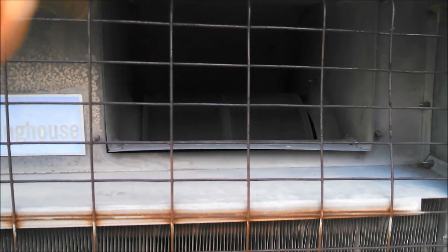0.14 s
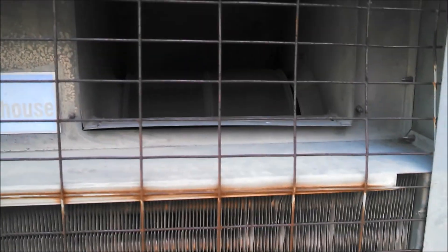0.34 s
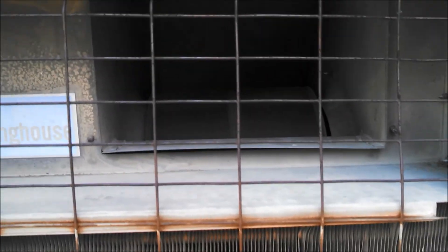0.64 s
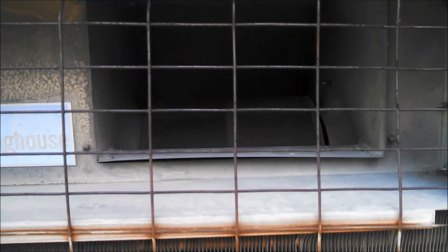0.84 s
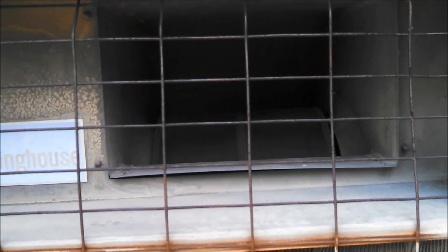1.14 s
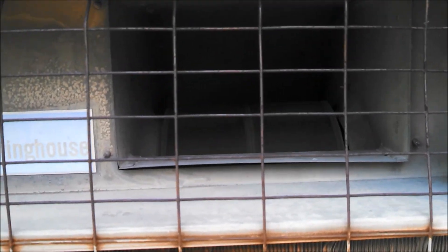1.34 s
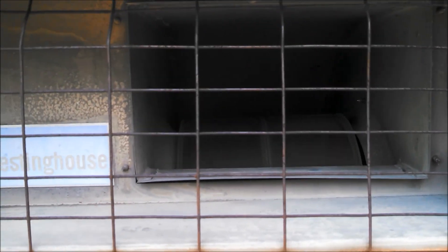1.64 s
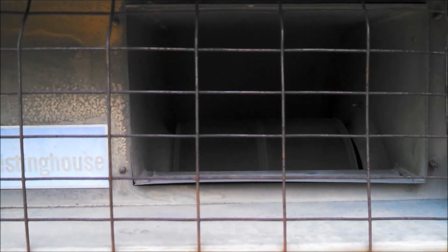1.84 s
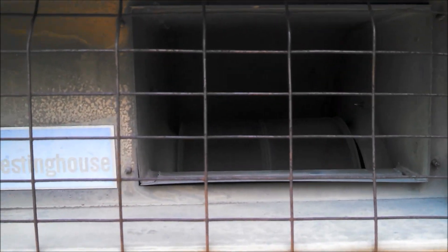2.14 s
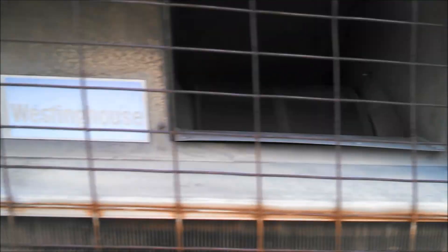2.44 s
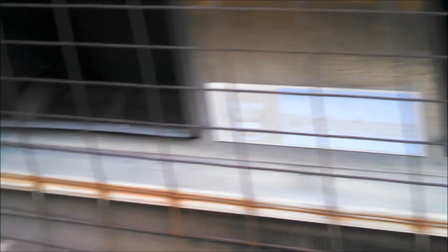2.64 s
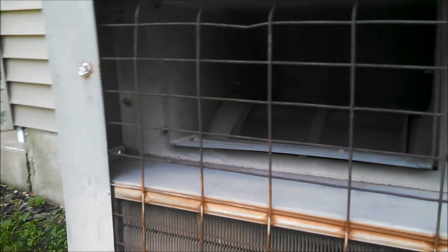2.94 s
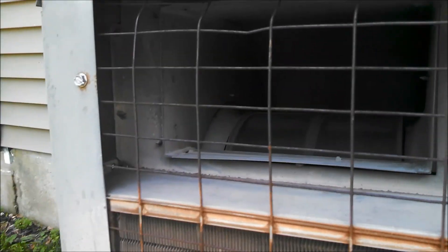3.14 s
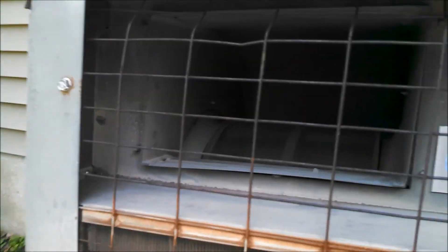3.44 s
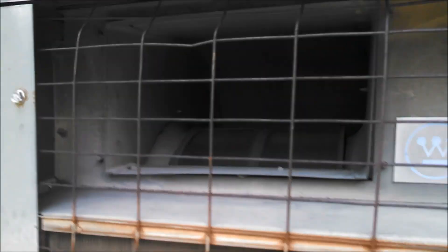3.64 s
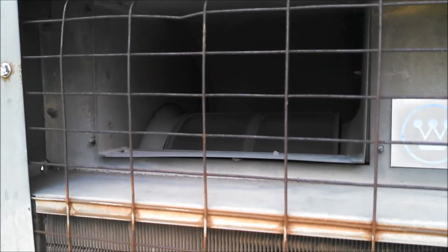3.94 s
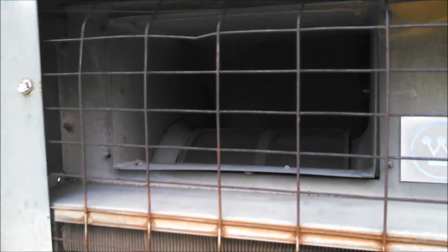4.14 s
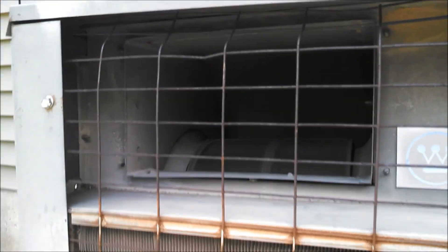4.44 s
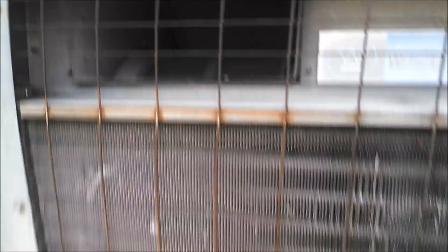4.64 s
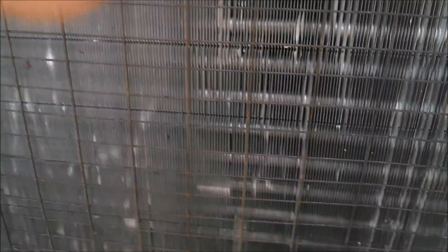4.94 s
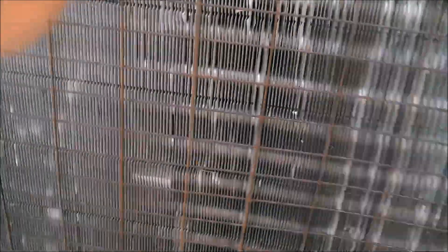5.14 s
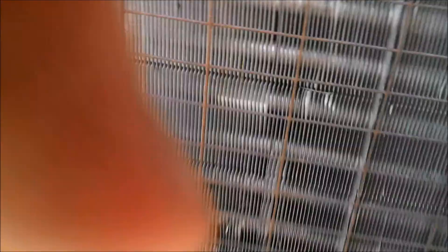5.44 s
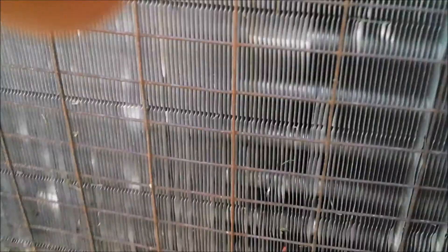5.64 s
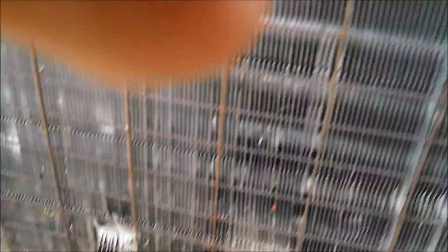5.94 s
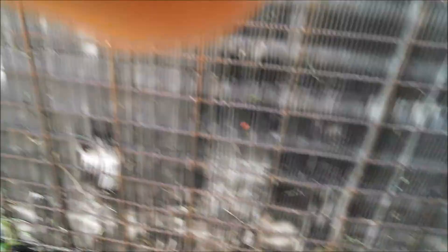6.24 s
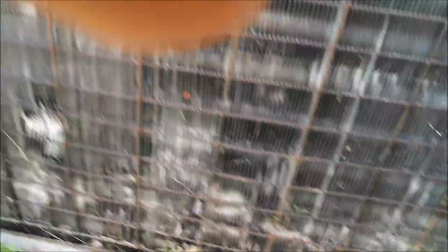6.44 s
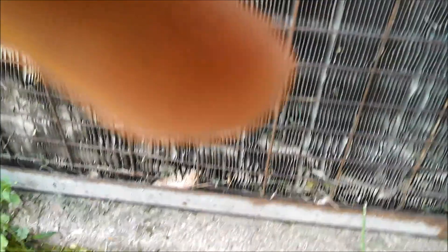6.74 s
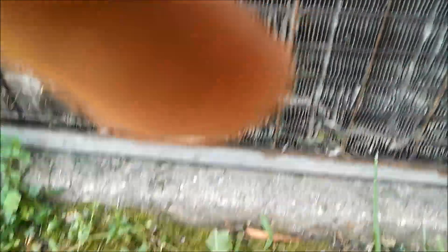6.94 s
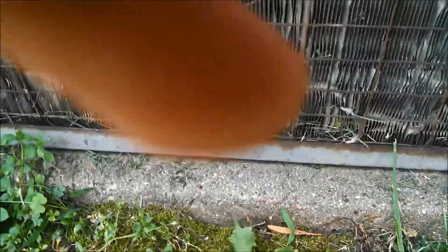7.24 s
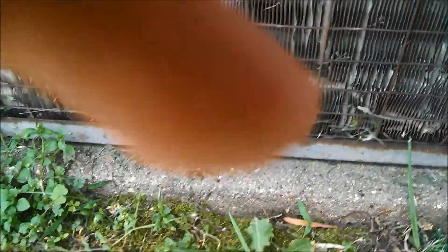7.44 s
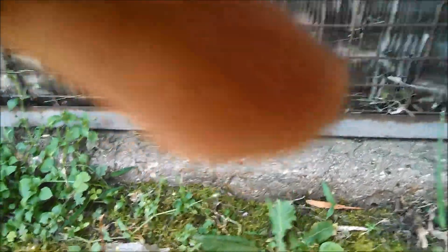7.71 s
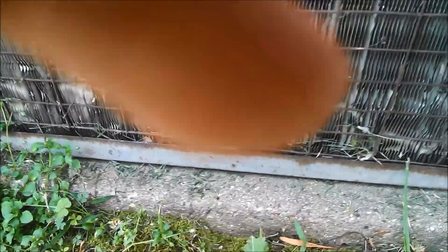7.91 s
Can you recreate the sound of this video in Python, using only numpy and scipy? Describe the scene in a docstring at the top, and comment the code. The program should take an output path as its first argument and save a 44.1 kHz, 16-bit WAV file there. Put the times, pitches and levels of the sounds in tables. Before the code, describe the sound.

Outdoors, a handheld microphone sits in the air stream of an old window air conditioner. Loud, distorted wind rumble, flutter and sharp slaps cover the machine, with one momentary break before three seconds. Past five and a half seconds the wind drops away with a flare of keen hiss, and the fan's rapidly throbbing rush, ringing metal cabinet and compressor hum come forward, steady to the end.

```python
"""Outdoors, a hand-held microphone close to an old window air conditioner: fan rush throbs once a shaft turn over hum.
At first it sits in the outlet's air stream: shaped noise and short slaps buffet it into clipping.
Near 2.7 s it swings out of the stream briefly; near 5.7 s it sinks out of it, and a keen edge flares in the hiss.
Then, down by the coil, the fan (noise rung through cabinet resonances), the fin hiss (bright noise) and the
compressor (wavering sines) come forward, with a few weaker puffs of air."""
import sys
import numpy as np
from scipy.fft import rfft, irfft, next_fast_len
from scipy.io import wavfile
from scipy.ndimage import uniform_filter1d, map_coordinates

SR = 44100
rng = np.random.default_rng(int(sys.argv[2]) if len(sys.argv) > 2 else 0)


def generate_wav(sig):
    """Save sig (samples, or channels by samples) to the path in sys.argv[1] as 16-bit PCM at SR."""
    pcm = np.round(np.clip(np.atleast_2d(sig).T, -1, 1) * 32767).astype(np.int16)
    wavfile.write(sys.argv[1], SR, pcm)


N = 356063

# All levels are relative: trims in the functions add to them.
# How much of the machine reaches the microphone: (time [s], fan level [dB], fin hiss level [dB])
NEARNESS = [(0, -37, -59.5), (1, -38, -62), (1.5, -36.5, -62.5), (3.5, -38, -61), (4.8, -37.5, -62),
            (5.25, -36, -58), (5.65, -31.5, -55), (5.72, -31.5, -43), (6.0, -26.5, -48.5),
            (6.4, -22.5, -43.5), (7.1, -20, -40), (7.3, -17, -39), (7.45, -21.5, -44), (8.07, -21.5, -43)]
# Share of the cabinet's ring in the rush, greater down by the coil: (time [s], share [0-1])
RING_SHARE = [(5.3, 0.55), (6.2, 1)]
# Cabinet resonances and the hollows between them: (centre [Hz], width [Hz], level [dB])
CABINET_MODES = [(328, 33, -4.5), (625, 310, 3), (1100, 37, -1.5), (1120, 40, 9), (1205, 45, -6.5),
                 (1277, 80, 6.5), (1405, 78, 9.5), (1400, 35, -2), (1797, 77, 8.5), (3230, 550, 3),
                 (5330, 160, 5)]
# Noise colour of the fan's rush: (frequency [Hz], level [dB per Hz])
FAN_COLOUR = [(40, -19), (100, 1), (165, -3.5), (225, -1.5), (300, -3.5), (400, -1.5), (700, -0.4),
              (950, -5.5), (1500, -9), (2100, -13), (3300, -15), (4400, -22), (5600, -25), (8000, -41),
              (12000, -74)]
# Noise colour of air hissing through the fins: (frequency [Hz], level [dB per Hz])
FIN_COLOUR = [(1000, -44), (3000, 4.5), (5500, -6), (6500, -2.5), (9500, 3.5), (12000, -6.5), (15000, -11)]
# Noise colour of the keen hiss over the edge of the fins: (frequency [Hz], level [dB per Hz])
KEEN_COLOUR = [(4500, -10), (5800, -9), (6400, -2), (7000, -11), (8500, -37)]
# Noise colour of the outlet's hiss: (frequency [Hz], level [dB per Hz])
OUTLET_COLOUR = [(200, 4.5), (700, -34), (1500, 6), (2700, -8.5), (4000, -13), (5500, -6.5), (8000, -64)]
# Tones of the compressor, motor and panels, close to the coil: (frequency [Hz], rms level [dB])
TONES = [(101.8, -43), (116, -32.5), (120, -34.5), (139.1, -38), (153.9, -44), (203.6, -42), (213.5, -49),
         (222, -36.5), (231, -47), (239.5, -35.5), (258.6, -47.5), (290.5, -46.5), (359.5, -38), (379, -36),
         (406, -48), (416.5, -43.5), (433.5, -43.5), (461.3, -38.5), (475, -42.5), (535, -41.5),
         (572.8, -46), (581.2, -44), (604.6, -43), (618.7, -40.5), (683.7, -43.5), (810, -40.5), (877, -55),
         (958, -46), (1099, -38.5), (1120, -44), (1157, -43), (1261, -43), (1421, -41.5), (1502, -48),
         (1965, -52), (2200, -58), (2374, -58.5), (2476, -64), (2547, -56), (3058, -58), (4915, -65),
         (5459, -60)]
# Strength of the air stream on the microphone: (time [s], level [dB])
STREAM = [(0, -9.5), (0.8, -6.5), (0.95, -11.5), (1.27, -7), (1.8, -8.5), (2.25, -6.5), (2.64, -8),
          (2.7, -35), (2.82, -18.5), (2.87, -8), (3.7, -6.5), (4.27, -7.5), (4.72, -15), (5.0, -8.5),
          (5.3, -9.5), (5.63, -14), (5.69, -32.5), (6.3, -24), (8.07, -31.5)]
# Separate puffs that hit the microphone: (time [s], length [s], slow buffet [dB], fast flutter [dB])
PUFFS = [(0.09, 0.49, -15, -18), (1.323, 0.13, -11, -15), (1.74, 0.15, -25, -19), (2.195, 0.39, -22, -13.5),
         (2.503, 0.17, -25, -15), (3.116, 0.061, -22, -17), (3.585, 0.058, -15, -24),
         (4.533, 0.022, -12, -9), (4.686, 0.044, -6, -15), (5.303, 0.057, -2.5, -24),
         (5.544, 0.041, -8.5, -15), (5.742, 0.036, -19, -21), (6.443, 0.04, -14.5, -23),
         (6.682, 0.06, -13, -21.5), (7.806, 0.22, -23, -42)]
# Brief gaps in the stream: (time [s], length [s], level change [dB])
LULLS = [(0.25, 0.018, -8), (0.517, 0.032, -7), (1.166, 0.0069, -15), (2.297, 0.011, -12),
         (2.354, 0.012, -10), (2.599, 0.031, -16), (3.37, 0.012, -12), (3.426, 0.017, -8),
         (3.677, 0.057, -7), (3.762, 0.014, -11), (4.339, 0.026, -13), (4.685, 0.024, -24),
         (5.373, 0.066, -10.5), (5.57, 0.029, -29)]
# Hard eddies that slap the microphone: (time [s], level [dB], swirl decay [s], brightness [dB per octave])
SLAPS = [(0.023, -13.5, 0.0035, -4.5), (0.036, -16, 0.0036, 5), (0.058, -7.5, 0.004, -1),
         (0.083, -18.5, 0.003, -5), (0.148, -4.5, 0.0036, 0), (0.16, -10.5, 0.0061, -1.5),
         (0.177, -11, 0.0016, 0.5), (0.256, -5.5, 0.0013, 1.5), (0.385, -15.5, 0.004, -1),
         (0.4, -16.5, 0.008, 2.5), (0.566, -18, 0.0097, 0), (0.625, -19, 0.0025, 0.5),
         (0.667, -18.5, 0.008, 2.5), (0.695, -19.0, 0.0021, 2), (0.747, -12.5, 0.0025, 0.5),
         (0.796, -14, 0.012, -1.5), (0.832, -24, 0.0023, -7.5), (1.041, -16, 0.0041, -1.0),
         (1.276, -14.5, 0.0032, 2.5), (1.296, -16.5, 0.0057, 2), (1.363, -19, 0.0022, -4.5),
         (1.498, -14, 0.0015, -2.5), (1.522, -15.5, 0.0077, 2.5), (1.692, -16.5, 0.0038, 0),
         (1.706, -17, 0.0033, 1.5), (1.843, -12, 0.005, 3.5), (1.896, -18.0, 0.01, -3),
         (2.074, -19, 0.0068, -1.5), (2.101, -15, 0.0017, -1.5), (2.22, -16.5, 0.0031, 4),
         (2.265, -20, 0.0022, 4.5), (2.33, -16.5, 0.004, -3), (2.38, -12.5, 0.0042, -3),
         (2.443, -15.5, 0.0019, 4), (2.48, -9.5, 0.004, -0.5), (2.521, -20, 0.011, -3),
         (2.581, -11.5, 0.0023, -1.5), (2.611, -19.5, 0.0021, -0.5), (2.856, -16.5, 0.0032, 0),
         (2.982, -16.0, 0.0029, -1), (3.059, -14, 0.003, 1.5), (3.114, -15.5, 0.0053, 2.5),
         (3.146, -13.5, 0.0088, 2), (3.378, -12.5, 0.0069, -1), (3.407, -16, 0.0035, 5),
         (3.548, -15, 0.0076, 2), (3.776, -11.5, 0.0036, 3), (3.854, -13.5, 0.0079, 2),
         (3.888, -16, 0.0015, -4.5), (3.994, -12.5, 0.0026, 1), (4.052, -14.5, 0.0038, -1.5),
         (4.099, -19.0, 0.002, -3), (4.157, -19.5, 0.0032, -2), (4.18, -19, 0.0031, 2.5),
         (4.256, -9, 0.0065, -0.5), (4.343, -20.5, 0.0017, -1.5), (4.401, -21, 0.002, -4),
         (4.436, -12.5, 0.0038, 2), (4.534, -20, 0.0031, -4), (4.653, -11, 0.0054, 2),
         (5.528, -18.5, 0.0033, -5)]
# Colour of a slap: (frequency [Hz], level [dB per Hz])
SLAP_COLOUR = [(100, 8), (350, 26), (800, 12.5), (1400, 2), (2600, -11.5), (3500, -19.5), (5000, -26.5),
               (14000, -51)]
# Noise colour of the slow buffet: (frequency [Hz], level [dB per Hz])
BUFFET_COLOUR = [(15, -36), (30, -19), (60, 1), (90, -1), (150, -6.5), (250, -14.5), (500, -33),
                 (1000, -105)]
# Noise colour of the faster flutter: (frequency [Hz], level [dB per Hz])
FLUTTER_COLOUR = [(80, -27), (200, -7), (320, 2.5), (480, -7), (700, -21.5), (1200, -31.5), (2500, -69)]
# Colour of the small eddies' spikes: (frequency [Hz], level [dB per Hz])
SPUTTER_COLOUR = [(120, -23), (350, 16), (650, 8.5), (1200, -7.5), (2000, -14), (3000, -27.5), (5000, -32),
                  (14000, -63)]
# Noise colour of a thin jet across the port: (frequency [Hz], level [dB])
WHISK_COLOUR = [(1000, -5), (5500, 0), (15000, -24)]
# Machine in the two channels: (frequency [Hz], likeness [0-1], left minus right [dB], left lead [rad])
SOUND_PAIR = [(50, .7, -3, 2.7), (130, .4, 0, .8), (260, .3, 0, .3), (400, .75, -1.5, .1),
              (900, .7, -1.5, .1), (1100, .93, -1, .05), (1500, .97, -1.5, -.15), (1850, .75, -1.5, 0),
              (2300, .45, 3, 1.3), (3000, .75, 0, 2.2), (4000, .65, 0, 4.4), (5100, .35, 0, 3.8),
              (5600, .7, 0, .9), (7350, .98, 0, -3.14), (14700, .97, 0, -21.99)]
# Wind in the two channels: (frequency [Hz], likeness [0-1], left minus right [dB], left lead [rad])
WIND_PAIR = [(30, 0.96, -4, -3), (205, 1, -5, -2.5), (400, .92, -5, -2.5), (735, 0.59, -4, -1.67),
             (980, 0.97, -4.5, -1), (2180, 0.69, -2, 1), (4440, 0.48, -5, 4), (14800, 0.45, -2, 8.5)]

SHAFT_HZ, FIRST_SWELL_S = 18.587, 0.034
COIL_FAN_DB = -20.5  # fan level from which the microphone counts as close to the coil
KEEN_START_S, KEEN_RISE_S, KEEN_SETTLE_S = 5.66, 0.035, 0.18
KEEN_FLARE_DB = -41.5  # before the settling decay takes its part
KEEN_STEADY_DB = -6.5  # lasting part, relative to the fin hiss
PHASE_DRIFT_RAD = 0.12  # rms wander of each tone
FULL_STREAM_DB = -6  # the stream right in front of the outlet
FLUTTER_GROWTH = 1.38  # dB of flutter for each dB of stream
WHISK_AT_S, WHISK_LENGTH_S, WHISK_DB = 1.29, 0.17, -46
TOP_HZ = 15360  # band limit of the recorder


def fan(throb_db=1.36, hiss_throb_db=1.84, swirl_db=1.0, outlet_db=-50.5, drift_db=0.86):
    """The lopsided fan swells its rush once a turn; the cabinet rings along and the fins hiss."""
    fan_db, fins_db = curves(NEARNESS)
    drift = drift_db * wobble(9)
    fan_db, fins_db = fan_db + drift, fins_db + drift
    throb = shaft() * (1 + 0.2 * wobble(7)) + 0.12 * wobble(10)

    air = noise(FAN_COLOUR)
    ring_share = curves(RING_SHARE)[0]
    ringing_air = air + ring_share * (filtered(air, cabinet) - air)
    rush = even(ringing_air, size=4700) * amp(fan_db + swirl_db * wobble(90))
    # the low roar throbs half as much, in dB, as the bright rush off the blades
    roar = filtered(rush, lambda hz: 1 / (1 + (hz / 800) ** 4))
    blades = rush - roar

    hiss = noise(FIN_COLOUR) * amp(fins_db)
    hiss += noise(KEEN_COLOUR) * keen_gain(fins_db)
    hiss += noise(OUTLET_COLOUR) * amp(outlet_db)
    throbbing_rush = roar * amp(throb_db * throb / 2) + blades * amp(throb_db * throb)
    return throbbing_rush + hiss * amp(hiss_throb_db * throb)


def shaft():
    """The swell that comes once a turn of the fan, between -1 and 1."""
    return np.cos(2 * np.pi * SHAFT_HZ * (np.arange(N) / SR - FIRST_SWELL_S))


def cabinet(hz, ripple_db=1):
    """Gain of a few strong resonances and hollows over a thicket of weak panel modes."""
    strong_db = sum(db / (1 + (2 * (hz - centre) / width) ** 2) for centre, width, db in CABINET_MODES)
    thicket = map_coordinates(rng.standard_normal(SR // 30), [hz / 30])  # one random knot every 30 Hz
    thicket_share = np.interp(hz, [300, 1500, 6000, 10000], [0, 1, 0.7, 0.1])
    return amp(strong_db + ripple_db * thicket * thicket_share)


def keen_gain(fins_db):
    """Air over the fins' edge flares keen as the microphone comes level, then settles to a share of the hiss."""
    age = np.maximum(np.arange(N) / SR - KEEN_START_S, 0)
    flare = np.minimum(age / KEEN_RISE_S, 1) * np.exp(-age / KEEN_SETTLE_S)
    return amp(KEEN_FLARE_DB) * flare + amp(fins_db + KEEN_STEADY_DB)


def compressor(hum_db=0.5, waver_db=2.0, throb_db=4.5, sway_s=0.00005, shiver_s=0.00003, left_db=1, falloff=1.27):
    """Tones waver as panels shiver and the microphone sways, pulse with the fan, and fade away from the coil."""
    fan_db, _ = curves(NEARNESS)
    swayed_time = np.arange(N) / SR + sway_s * wobble(3)
    turn_db = throb_db * shaft()
    hum = np.zeros(N)
    for hz, db in TONES:
        pulsing = np.clip(hz / 1400, 0.4, 1)  # high tones pulse most
        cycles = hz * (swayed_time + shiver_s * wobble(30)) + rng.random()
        phase = 2 * np.pi * cycles + PHASE_DRIFT_RAD * wobble(7.3)
        hum += amp(db + waver_db * wobble(7) + pulsing * turn_db) * np.sin(phase)
    distance_db = falloff * np.minimum(fan_db - COIL_FAN_DB, 0)
    sides = amp([[left_db], [-left_db]])
    return np.sqrt(2) * hum * amp(hum_db + distance_db) * sides  # sqrt(2): tone levels are rms


def wind(buffet_db=2, flutter_db=0.0, sputter_db=-8.5, lump_db=3.0, flutter_gust_db=6, sputter_gust_db=3, port_top=1.53):
    """Turbulence on the microphone, pushed along by each turn of the fan; flutter gusts most with each swirl."""
    slow_db, fast_db = airflow()
    swirl = np.minimum(unit(0.6 * wobble(50) + wobble(140) + 0.55 * shaft()), 1.7)
    buffet = even(noise(BUFFET_COLOUR) * amp(lump_db * swirl), size=2600) * amp(slow_db + buffet_db)
    flutter = even(noise(FLUTTER_COLOUR) * amp(flutter_gust_db * swirl), size=2600) * amp(fast_db + flutter_db)
    sputter = even(small_eddies() * amp(sputter_gust_db * swirl), size=2600) * amp(fast_db + sputter_db)
    # the capsule gives way softly under the large slow swings; the quick spikes ride on top
    swings = buffet + flutter
    softened = swings / (1 + (swings / port_top) ** 4) ** (1 / 4)
    return softened + sputter + slaps() + whisk()


def airflow(flutter_db=-18, unrest_db=0.64):
    """Buffet and flutter levels in dB: flutter grows faster than the stream; puffs add power, lulls cut gaps."""
    stream_db = curves(STREAM)[0] + unrest_db * wobble(15)
    slow_power = amp(stream_db) ** 2
    fast_power = amp(flutter_db + FLUTTER_GROWTH * (stream_db - FULL_STREAM_DB)) ** 2
    for s, length, slow_db, fast_db in PUFFS:
        swell = bell(s, length)
        slow_power = slow_power + swell * amp(slow_db) ** 2
        fast_power = fast_power + swell * amp(fast_db) ** 2
    gaps_db = sum(db * bell(s, length) for s, length, db in LULLS)
    return 10 * np.log10(slow_power) + gaps_db, 10 * np.log10(fast_power) + gaps_db


def small_eddies(scatter_db=8.0, rate=180):
    """An uneven train of small pressure spikes, rate a second, coloured and scaled to rms 1."""
    # one spike falls somewhere in each slot of time, so long gaps are rare
    slots = np.arange(int(N * rate / SR))
    at = ((slots + rng.random(len(slots))) * SR / rate).astype(int)
    strength = amp(scatter_db * np.minimum(rng.standard_normal(len(at)), 1.4))
    spikes = np.zeros((2, N))
    spikes[:, at] = strength * rng.choice([-1, 1], size=(2, len(at)))
    return unit(colour(spikes, SPUTTER_COLOUR))


def slaps(slap_db=22, spike_db=-2, swell=0.28):
    """Each hard eddy is a rough swirl around a pressure spike: short ones tick, long ones rip, dull ones thump."""
    size, lead = 4096, 512  # samples: whole burst, silence ahead of it
    out = np.zeros((2, N + SR))
    t = np.maximum(np.arange(size) - lead, 0) / SR
    octaves = np.log2(np.clip(np.fft.rfftfreq(size, 1 / SR), 250, 5000) / 1000)  # from 1 kHz
    for s, db, decay_s, bright_db in SLAPS:
        envelope = np.exp(-t / decay_s) * (1 - np.exp(-t / (swell * decay_s))) ** 2
        burst = rng.standard_normal((2, size)) * envelope
        burst /= np.linalg.norm(burst[0])
        burst[0, lead + round(decay_s * SR / 2)] += amp(spike_db) * rng.choice([-1, 1])
        # the burst covers all pitches evenly before it is tilted bright or dull
        spectrum = rfft(burst)
        spectrum /= np.sqrt(np.abs(uniform_filter1d(np.abs(spectrum) ** 2, size=60, axis=-1)))
        start = max(round((s - swell * decay_s / 2) * SR) - lead, 0)
        out[:, start:start + size] += irfft(spectrum * amp(db + bright_db * octaves))
    return amp(slap_db) * colour(out, SLAP_COLOUR)


def whisk(rough_db=1.0):
    """A brief, faint, sputtering high hiss as a thin jet of air grazes the microphone's port."""
    rough_hiss = unit(noise(WHISK_COLOUR) * amp(rough_db * np.minimum(wobble(110), 1)))
    return rough_hiss * amp(WHISK_DB) * bell(WHISK_AT_S, WHISK_LENGTH_S)


def stereo(x, pair):
    """The right channel hears x[0]; the left hears it shifted in phase, blended with the unrelated x[1]."""
    f, alike, balance_db, lead = np.transpose(pair)

    def blend(hz):
        share = np.interp(hz, f, alike)
        turn = amp(np.interp(hz, f, balance_db)) * np.exp(1j * np.interp(hz, f, lead))
        return np.array([share, np.sqrt(1 - share ** 2)]) * turn

    left = filtered(x, blend).sum(axis=0)
    return np.array([left, x[0]])


def amp(db):
    """Decibels to gain."""
    return 10 ** (np.asarray(db) / 20)


def unit(x):
    """x scaled to rms 1."""
    return x / np.sqrt(np.mean(x ** 2) + 1e-20)


def curves(rows):
    """One value per sample for each column after the time."""
    s, *columns = np.transpose(rows)
    return [np.interp(np.arange(N) / SR, s, column) for column in columns]


def wobble(rate):
    """A smooth random curve of rms 1, rate knots a second."""
    knots = rng.standard_normal(int(N * rate / SR) + 4)
    return unit(map_coordinates(knots, [np.arange(N) * rate / SR]))


def bell(s, length):
    """A smooth swell around a moment, peak 1, length seconds wide at 1/e."""
    return np.exp(-(2 * (np.arange(N) / SR - s) / length) ** 2)


def filtered(x, response):
    """x times a response of frequency, cut to N samples."""
    m = next_fast_len(N + 8192)
    return irfft(rfft(x, m) * response(np.fft.rfftfreq(m, 1 / SR)), m)[..., :N]


def colour(x, points):
    """x shaped by (frequency [Hz], level [dB]) points on a log axis."""
    f, db = np.transpose(points)
    return filtered(x, lambda hz: amp(np.interp(np.log(hz + 1), np.log(f), db)))


def noise(points):
    """Two unrelated noises of one colour, rms 1."""
    return unit(colour(rng.standard_normal((2, N)), points))


def even(x, size):
    """x with the chance swells of its level smoothed over size samples, rms 1."""
    local_power = np.abs(uniform_filter1d(x ** 2, size, axis=-1))
    return unit(x / np.sqrt(local_power + 0.1 * np.mean(x ** 2)))


def scene():
    """Machine plus wind; wind strikes one port, so its lows reach the channels in nearly opposite phase."""
    return stereo(fan(), SOUND_PAIR) + compressor() + stereo(wind(), WIND_PAIR)


def record(dry):
    """The recorder clips at full scale with a slightly rounded knee, then keeps nothing above its band limit."""
    clipped = dry / (1 + np.abs(dry) ** 12) ** (1 / 12)
    return filtered(clipped, lambda hz: hz < TOP_HZ)


dry = scene()
out = record(dry)
generate_wav(out)
```